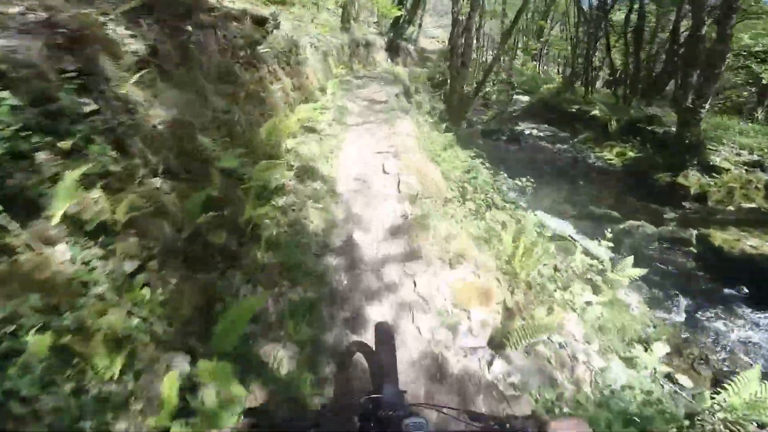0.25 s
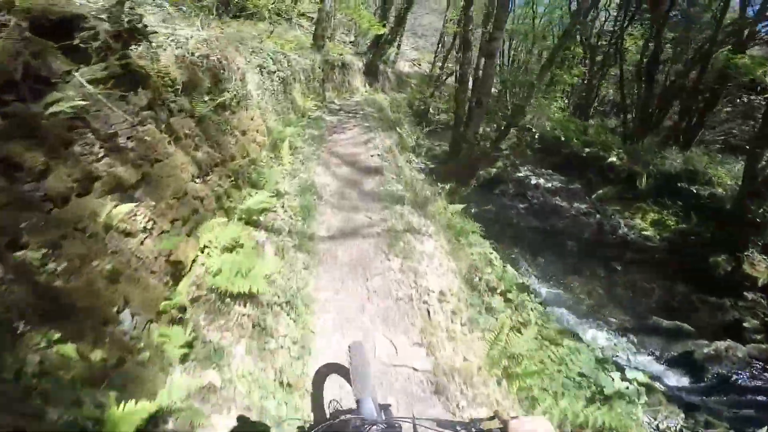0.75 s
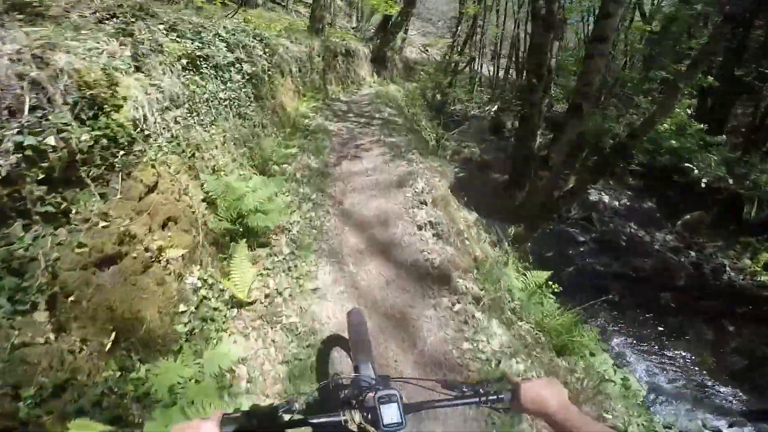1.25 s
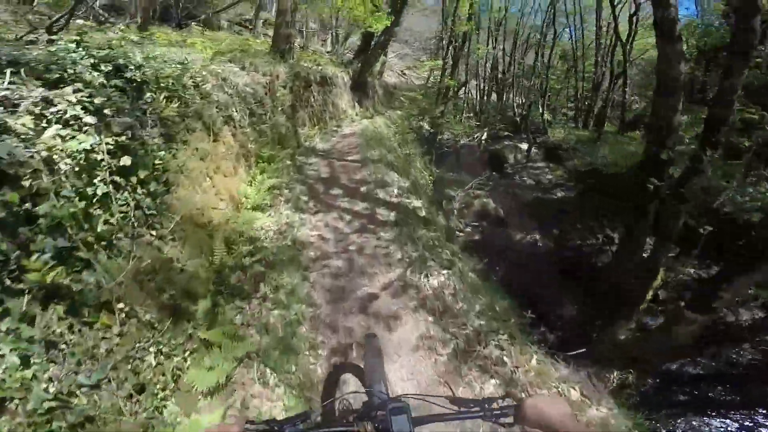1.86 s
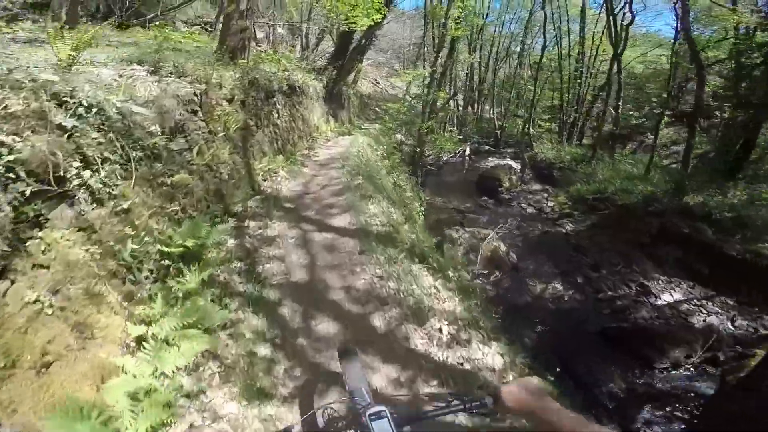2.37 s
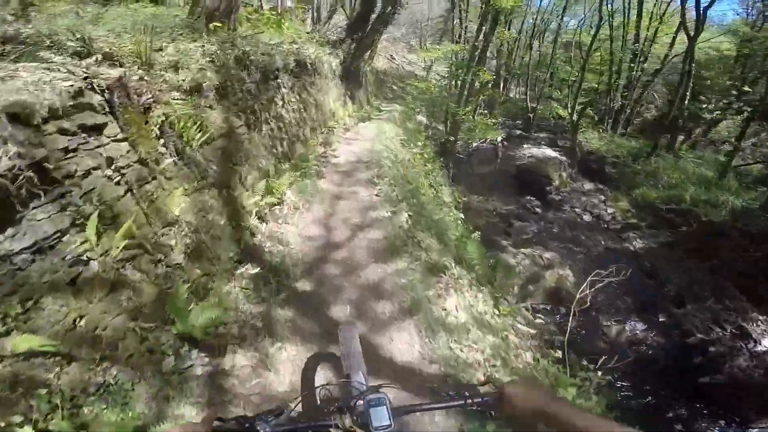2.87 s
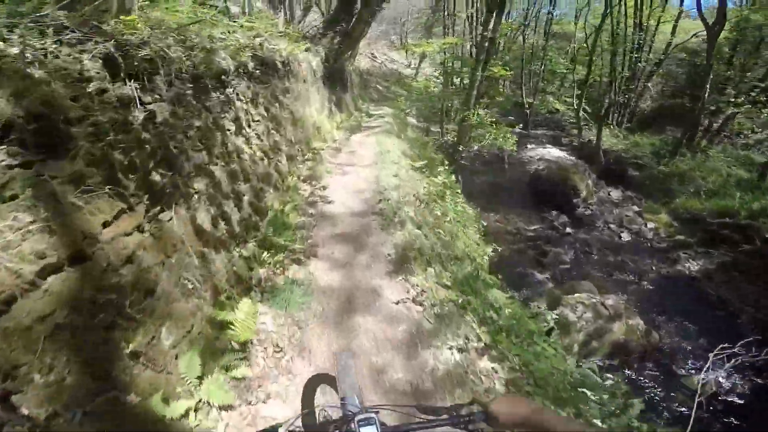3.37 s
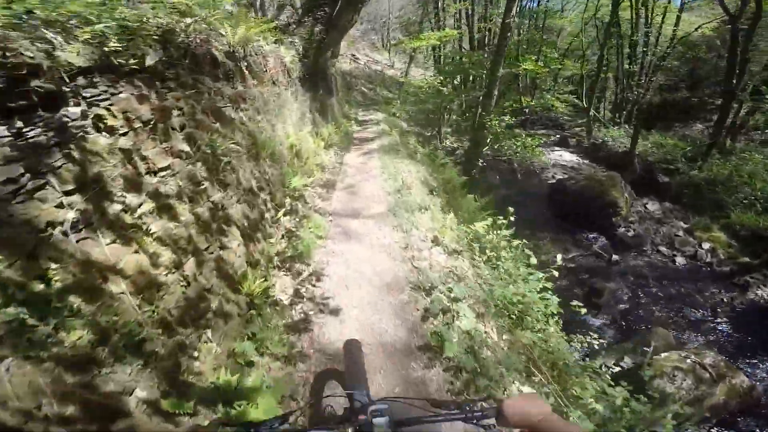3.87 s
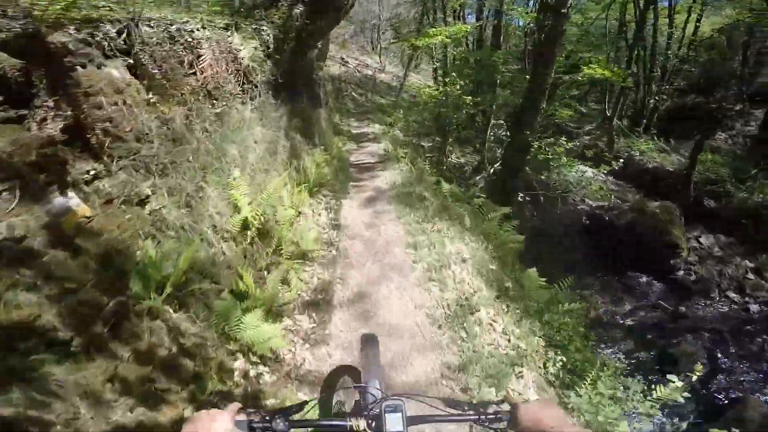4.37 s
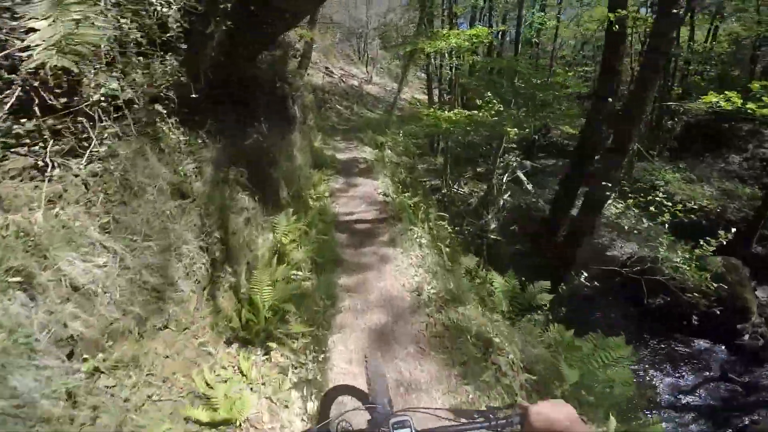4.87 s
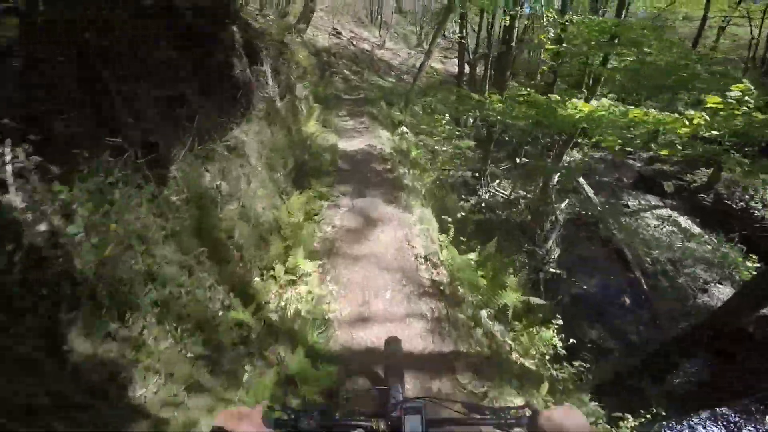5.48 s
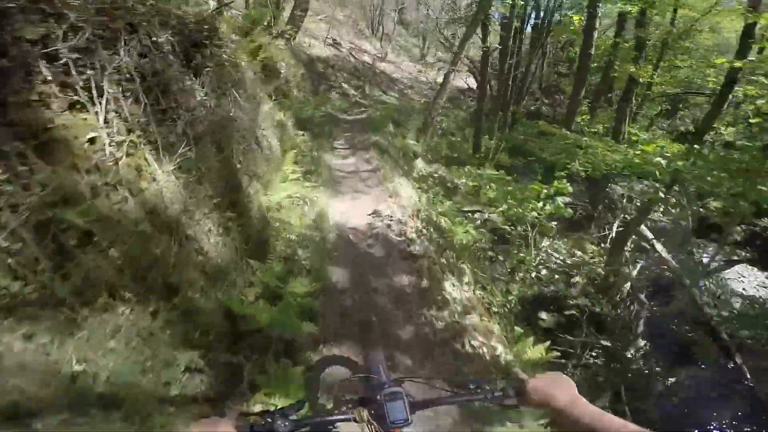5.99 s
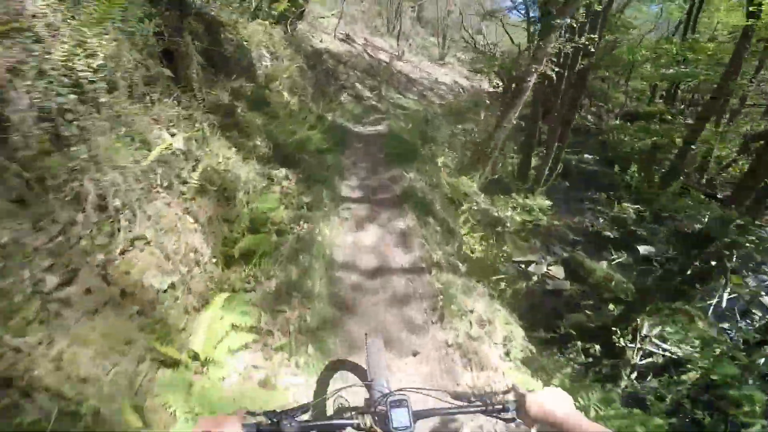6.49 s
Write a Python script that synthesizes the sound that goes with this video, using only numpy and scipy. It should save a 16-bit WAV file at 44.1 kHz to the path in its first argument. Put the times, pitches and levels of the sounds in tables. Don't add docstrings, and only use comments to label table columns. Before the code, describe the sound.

A bicycle rolls along a woodland path beside a stream, heard close through a small boxed-in camera microphone. Heavy low wind lumps and rattling parts open it, then the wind drops and a steady boxy hiss of tyres and water remains, with small ticks. Three crisp snaps come mid-way, a faint bird whistles far off, and gusts thump again at the end.

```python
import sys
import numpy as np
from scipy import signal
from scipy.fft import rfft, irfft, next_fast_len
from scipy.io import wavfile
from scipy.ndimage import uniform_filter1d, map_coordinates

SR = 44100
rng = np.random.default_rng(int(sys.argv[2]) if len(sys.argv) > 2 else 0)


def bounce(signal):
    frames = np.transpose(np.atleast_2d(signal))
    limited = np.clip(frames, -1, 1)
    pcm = np.round(limited * 32767).astype(np.int16)
    wavfile.write(sys.argv[1], SR, pcm)


def amplitude_ratio(level_db):
    exponent = np.asarray(level_db, float) / 20
    return 10 ** exponent


N = 297234
OPEN_HZ = 16700


def unit(x):
    return x / np.sqrt(np.mean(x ** 2) + 1e-20)


def along(points, hz):
    f, v = np.transpose(points)
    return np.interp(np.log(hz + 1), np.log(f + 1), v, left=-120, right=-120)


def curves(rows):
    s, *cols = np.transpose(rows)
    return [np.interp(np.arange(N) / SR, s, c) for c in cols]


def swell(s, half_s):
    t = np.arange(0, N + 64, 64) / SR
    return np.exp(-.5 * ((t - s) / half_s) ** 2)


def spread_out(v):
    return np.interp(np.arange(N), np.arange(len(v)) * 64, v)


def wobble(rate):
    knots = rng.standard_normal(int(N * 40 / SR) + 4)
    return map_coordinates(knots, [np.arange(N) * min(rate, 40) / SR])


def filtered(x, response):
    m = next_fast_len(len(x) + SR // 2)
    return irfft(rfft(x, m) * response(np.fft.rfftfreq(m, 1 / SR)), m)[:len(x)]


def housing(hz):
    # (frequency [Hz], width [Hz], lift [dB])
    case_modes = [(853, 106, 4.5), (1960, 210, 6.5), (2520, 360, 2), (3078, 72, 5), (3595, 260, 5.5),
                  (4150, 54, 3.5), (4788, 210, 10), (5580, 190, 5.5), (6920, 360, 3.5), (8060, 180, 1.5),
                  (9440, 400, 4), (10700, 350, 3), (14140, 240, 7)]
    lift = 0
    for centre, width, db in case_modes:
        damping = 1j * hz * width
        lift = lift + (amplitude_ratio(db) - 1) * damping / (centre * centre - hz * hz + damping)
    return 1 + lift


def rush(spectrum, patchy_db, grit):
    z = signal.stft(rng.standard_normal(N), nperseg=512)[2]
    field = uniform_filter1d(rng.standard_normal(z.shape), size=6, axis=0)
    field = uniform_filter1d(field, size=8, axis=1)
    x = signal.istft(z * amplitude_ratio(patchy_db * unit(field)), nperseg=512)[1][:N]
    struck = rng.random(N) < .004
    grain_db = 5 * np.minimum(rng.exponential(size=N), 2)
    grains = unit(rng.standard_normal(N) * struck * amplitude_ratio(grain_db))
    return unit(filtered(unit(x) + grit * grains, lambda hz: amplitude_ratio(along(spectrum, hz)) * housing(hz)))


def turbulence(spectrum, memory_s, steady):
    x = unit(filtered(rng.standard_normal(N), lambda hz: amplitude_ratio(along(spectrum, hz))))
    memory = int(memory_s * SR)
    power = np.abs(uniform_filter1d(uniform_filter1d(x * x, memory), memory)) + 0.022
    x = x / power ** (np.clip(steady, 0, 1) / 2)
    return unit(filtered(x, lambda hz: np.minimum(1, amplitude_ratio(along(spectrum, hz) + 17.5))))


def breeze():
    # (time [s], strength [dB])
    head_wind = [(0, -12), (.35, -25), (.6, -27), (1.1, -35.5), (1.6, -35.5), (2.3, -35), (3.1, -38),
                 (4.5, -38), (5.4, -37), (6.0, -36.5), (6.2, -28.5), (6.55, -26.5), (6.74, -33)]
    calm_db = -36
    return curves(head_wind)[0] - calm_db


def ruffle():
    # (time [s], flutter lift [dB], half length [s])
    side_air = [
        (.5, 4, 0.075),
        (0.857, 4, 0.07),
        (1.75, 1, 0.24),
        (4.0, 0, 0.079),
        (5.75, 4, 0.17),
    ]
    return spread_out(sum(db * swell(s, half_s) for s, db, half_s in side_air))


def slaps():
    # (time [s], peak level [dB], width [ms], push + or pull - [ratio])
    slap_events = [(.003, -10, 6.9, -0.82), (.039, -4, 4.5, 0.98), (0.144, -8.5, 4.5, 0.97),
                   (0.178, -6.5, 8.3, -1.3), (0.207, -5, 4.2, 1), (0.289, -8, 5.3, 1),
                   (0.348, -8.5, 5, 0.98), (.826, -10, 11, 0.88), (.967, -12, 5.3, -0.82),
                   (3.36, -5, 6, 0.26), (6.153, -11.5, 4.4, 1), (6.18, -14, 4.2, -1.17),
                   (6.241, -4.5, 5.2, 0.81), (6.44, -6, 4.6, -0.84), (6.587, -10.5, 8.3, 0.97),
                   (5.563, -18.5, 5.8, -1)]
    t = np.arange(0, N + 32, 32) / SR
    push, busy = 0, 0
    for s, db, width_ms, way in slap_events:
        push = push + way * amplitude_ratio(db) * np.exp(-.5 * ((t - s) * 1000 / width_ms) ** 2)
        busy = busy + np.exp(-.5 * ((t - s) / 0.018) ** 2)
    push, busy = (map_coordinates(v, [np.arange(N) / 32], mode="nearest") for v in (push, busy))
    leak_hz = 9
    return filtered(push, lambda hz: hz ** 2 / (hz ** 2 + leak_hz ** 2)), np.minimum(busy, 1)


def wind():
    # (frequency [Hz], density [dB per Hz])
    eddy_spectrum = [(3, -1), (8, -17.5), (13, -2), (20, -2), (28, -28), (40, -21)]
    buffet_spectrum = [(16, -17), (26, 2.5), (38, 5.5), (52, -6.5), (64, -12), (80, -31)]
    throb_spectrum = [(42, -33), (58, -1), (68, 1.5), (85, -9.5), (110, -30.5), (160, -38)]
    flutter_spectrum = [(60, -49), (100, 4.5), (150, -3.5), (250, -9.5), (400, -10.5), (600, -17.5),
                        (900, -40)]
    # (time [s], swing [dB], half length [s], tilt to small eddies [dB])
    gust_events = [(0.096, -19, 0.019, 5.5), (0.203, -6, 0.028, 7), (0.302, 8.5, 0.043, 2),
                   (0.76, 1, .04, 1.5), (.99, 5.5, 0.049, 1.5), (1.342, 1.5, 0.073, 5),
                   (1.543, -2.5, 0.046, 0.5), (1.77, 5.5, 0.032, -7.5), (1.856, -3, .04, 6.5),
                   (1.94, 6, 0.018, -5.5), (2.278, 3, 0.021, -2), (2.425, 4.5, 0.053, -1.5),
                   (2.509, -8.5, 0.039, -3), (2.753, 1.5, 0.052, -8), (2.97, 3.5, 0.023, 3.5),
                   (3.085, -8, 0.039, 6.5), (3.478, -5, 0.014, 3.5), (3.778, 4.5, 0.051, -0.5),
                   (4.233, 6, 0.014, -3.5), (4.705, 0, .025, 6.5), (4.773, 3, 0.037, -0.5),
                   (4.87, -6, 0.021, 0.5), (5.1, -2.5, 0.031, 4), (5.267, 1, 0.034, -4),
                   (5.45, -3.5, 0.052, 2), (5.787, 1, 0.035, 5.5), (6.175, 16, 0.015, 2),
                   (6.377, -7.5, .03, -3.5), (6.44, 6.5, 0.021, 12.5), (6.642, -2, 0.036, 6)]
    swing = spread_out(sum(db * swell(s, half_s) for s, db, half_s, _ in gust_events))
    tilt = spread_out(sum(tilt_db * swell(s, half_s) for s, _, half_s, tilt_db in gust_events))
    over_calm_db = breeze()

    def level(calm_db, grows, lean, share):
        return amplitude_ratio(calm_db + grows * over_calm_db + share * (swing + lean * tilt))

    heave = turbulence(eddy_spectrum, 0.024, steady=0.73)
    heave = heave * level(calm_db=-32, grows=1.1371, lean=-1.03, share=0.95)
    buffet = turbulence(buffet_spectrum, 0.093, steady=0.76)
    buffet = buffet * level(calm_db=-40, grows=0.93, lean=0.08, share=1.42)
    throb = turbulence(throb_spectrum, 0.041, steady=0.66)
    throb = throb * level(calm_db=-49.5, grows=0.65, lean=1.24, share=1.24)
    lumps = amplitude_ratio(0.59 * wobble(17.0) + 1.86 * wobble(25))
    flutter = unit(lumps * rush(flutter_spectrum, patchy_db=-0.5, grit=0.23)) * amplitude_ratio(ruffle())
    flutter = flutter * level(calm_db=-61.5, grows=0.4828, lean=-0.2, share=0.13)
    slap, busy = slaps()
    return slap + amplitude_ratio(-12 * busy) * (heave + buffet + throb) + flutter


def tyres(near_db, shake):
    # (frequency [Hz], density [dB per Hz])
    drone_spectrum = [(300, -18.5), (500, -3.5), (750, -1), (1000, -5.5), (1200, -25), (1500, -12)]
    drone_db = -66 + near_db + 0.15 * breeze() + 0.17 * ruffle()
    return amplitude_ratio(drone_db + 0.68 * shake) * rush(drone_spectrum, patchy_db=1.5, grit=0.26)


def stream(near_db, shake):
    # (frequency [Hz], density [dB per Hz])
    water_spectrum = [(900, -17.5), (1150, -4), (1350, 1), (1700, -3), (2300, -5), (3300, -5.5),
                      (4200, -6.5), (4500, -14.5), (5200, -20), (6500, -70)]
    spray_spectrum = [(4000, -23), (5200, -3.5), (6300, -4.5), (8300, -5.5), (9000, -9), (12000, -11),
                      (15600, -14.5)]
    water = amplitude_ratio(-57.5 + near_db + 0.53 * shake) * rush(water_spectrum, patchy_db=0.83, grit=0.23)
    spray = amplitude_ratio(-67.5 + near_db + 0.43 * shake) * rush(spray_spectrum, patchy_db=1.44, grit=0.2)
    return water + spray


def brake_pad():
    # (time [s], level [dB], decay by 60 dB [s])
    pad_touches = [
        (-.1, -72, 3.9),
        (5.6, -79, 9.5),
    ]
    drag_db, rise_s = -90, 0.033
    whisper = unit(filtered(rng.standard_normal(N), lambda hz: np.exp(-((hz - 10750) / 300) ** 2)))
    t = np.arange(N) / SR
    level = amplitude_ratio(drag_db)
    for s, db, t60 in pad_touches:
        level = level + amplitude_ratio(db - 60 * (t - s) / t60) * np.clip((t - s) / rise_s, 0, 1)
    return level * whisper


def path():
    # (time [s], level [dB])
    bank_nearness = [(0, 4), (.75, 3.5), (1.3, 3.5), (2.1, 0.94), (3, -0.14), (5, -0.7), (5.46, 0.6),
                     (6, 0.25), (6.74, -0.3)]
    near_db, = curves(bank_nearness)
    shake = wobble(14)
    return tyres(near_db, shake) + stream(near_db, shake) + brake_pad()


def loose_parts():
    # (frequency [Hz], density [dB per Hz])
    loose_spectrum = [(300, -17), (500, 5), (1000, 2.5), (1500, 7.5), (2200, -4.5), (3500, 0), (5000, -38)]
    # (time [s], level [dB], half length [s])
    jolt_events = [
        (0, -57, 0.11),
        (0.207, -53, .06),
        (.34, -55.5, 0.1),
        (0.97, -52.5, 0.044),
        (6.3, -61.5, 0.045),
        (6.447, -57, 0.038),
    ]
    chatter = unit(amplitude_ratio(3.3 * wobble(35)) * rush(loose_spectrum, patchy_db=3.5, grit=0.34))
    jolt = spread_out(sum(amplitude_ratio(db) * swell(s, half_s) for s, db, half_s in jolt_events))
    jingle = amplitude_ratio(-82.5 + 0.37 * breeze())
    return (jolt + jingle) * chatter


def ticks():
    # (time [s], peak level [dB], ringing frequency [Hz], decay by 60 dB [s])
    frame_contacts = [(0.118, -43, 5600, 0.017), (.14, -39.5, 1610, 0.094), (0.1793, -30, 1230, 0.022),
                      (.184, -44.5, 2940, .067), (0.2073, -33, 1830, 0.012), (.245, -53, 1850, .061),
                      (0.3115, -41.5, 1395, 0.078), (.357, -42, 1860, 0.025), (0.584, -46, 4150, .03),
                      (1.046, -45, 5200, .017), (1.197, -35, 1487, 0.12), (1.2045, -30.5, 1510, 0.013),
                      (1.209, -35, 2050, 0.027), (1.748, -47, 6800, .015), (1.89, -47, 6830, 0.019),
                      (3.3947, -44.5, 1950, .03), (4.8943, -43, 1950, 0.037), (5.8386, -51, 1960, .03),
                      (6.311, -45, 1930, 0.071)]
    # (time [s], peak level [dB], frequency [Hz], decay by 60 dB [s])
    root_thumps = [
        (.864, -39.5, 200, .028),
        (1.362, -38, 180, .034),
    ]
    tick_octaves, thump_octaves = .44, .7
    contacts = [(*r, tick_octaves) for r in frame_contacts] + [(*r, thump_octaves) for r in root_thumps]
    out, t = np.zeros(N + SR), np.arange(SR // 10) / SR
    for s, db, ring_hz, t60, spread in contacts:
        def band(f):
            octaves = np.log2((f + 1) / (.94 * ring_hz))
            return np.exp(-.5 * (octaves / spread) ** 2) * housing(f) ** 1.1
        rattle = unit(filtered(rng.standard_normal(len(t)), band))
        hit = rattle + 1.15 * np.sin(2 * np.pi * ring_hz * t)
        hit = hit * amplitude_ratio(-60 * t / t60) * (1 - np.exp(-t / 0.000043))
        out[round(s * SR):][:len(t)] += amplitude_ratio(db) * hit / np.abs(hit).max()
    return out[:N]


def tread_hum():
    # (time [s], length [s], tread frequency [Hz], rise at middle [Hz], level [dB])
    firm_stretches = [
        (2.7, 1.0, 250, 35, -79),
        (4.95, .55, 250, 42, -75),
    ]
    drift_hz, waver = 3 * wobble(12), amplitude_ratio(5.5 + 2 * wobble(8))
    hum = np.zeros(N)
    for s, length, hz, rise_hz, db in firm_stretches:
        arc = np.sin(np.pi * np.clip((np.arange(N) / SR - s) / length, 0, 1))
        phase = 2 * np.pi * np.cumsum(hz + rise_hz * arc ** 2 + drift_hz) / SR
        hum += amplitude_ratio(db) * np.sqrt(np.abs(arc)) * np.sin(phase)
    return waver * hum


def snaps():
    # (time [s], peak level [dB], crack share [ratio], bounce delay [s], bounce level [dB])
    snap_events = [
        (3.2053, -28.5, 0.48, .006, -9.5),
        (3.3398, -29, 0.36, .0058, -6.5),
        (4.2877, -28, 0.36, 0.0013, -17),
    ]
    # (frequency [Hz], level [dB])
    snap_modes = [
        [(1580, -10), (2450, -2.5), (3180, 0), (3900, -2), (4730, -2), (5400, -11), (6850, -4), (8100, 2.5),
         (9300, -12), (12500, -7), (15000, -11)],
        [(2010, -7), (2420, -8), (3130, -6), (3550, 0.5), (4170, -10), (4730, -2), (5900, -16), (6800, -7.5),
         (8230, -6.5), (10690, -14), (14400, -24)],
        [(875, -3), (1100, -9.5), (1340, -9), (1885, 4), (2440, -8), (3035, -7), (3900, -9), (4880, -10),
         (5900, -10), (6700, -11), (8150, -11), (9600, -10), (13000, -18)],
    ]
    t60 = .015
    out, t = np.zeros(N + SR), np.arange(SR // 20) / SR
    for (s, db, crack, delay, bounce_db), modes in zip(snap_events, snap_modes):
        (lowest_hz, _), (_, last_db) = modes[0], modes[-1]
        crack_spectrum = [(lowest_hz / 2, -35)] + modes + [(OPEN_HZ, last_db - 16)]
        for start, size_db in ((s, db), (s + delay, db + bounce_db)):
            ring = 0
            for hz, level in modes:
                decay = amplitude_ratio(level - 60 * t / t60 * (hz / 2000) ** 0.16)
                ring = ring + decay * np.sin(2 * np.pi * (hz * t + rng.random()))
            noise = unit(filtered(rng.standard_normal(len(t)), lambda f: amplitude_ratio(along(crack_spectrum, f))))
            noise = noise * amplitude_ratio(-60 * t / t60 * 2.2)
            hit = (ring + 3 * crack * noise) * (1 - np.exp(-t / 0.00038))
            out[round(start * SR):][:len(t)] += amplitude_ratio(size_db) * hit / np.abs(hit).max()
    return out[:N]


def bird():
    # (time [s], length [s], start frequency [Hz], end frequency [Hz], level [dB])
    chirp_events = [
        (4.67, .06, 6650, 6550, -70),
        (4.84, .06, 6400, 5450, -64),
        (4.945, .03, 4600, 4450, -66),
    ]
    out = np.zeros(N)
    for s, length, start_hz, end_hz, db in chirp_events:
        u = np.arange(int(length * SR)) / (length * SR)
        phase = 2 * np.pi * np.cumsum(start_hz + (end_hz - start_hz) * u ** 1.65) / SR
        quaver = 1.5 * wobble(40)[:len(u) * 8:8]
        out[round(s * SR):][:len(u)] += amplitude_ratio(db) * np.sin(np.pi * u) * np.sin(phase + quaver)
    return out


def scene():
    return (wind() + path() + loose_parts() + ticks() + tread_hum() + snaps() + bird())[None]


def low_pass(x):
    return signal.sosfilt(signal.butter(12, 16700, fs=SR, output="sos"), x)


def record(dry):
    hz, t, z = signal.stft(dry[0], SR, nperseg=1024, boundary="even")
    f = hz[:, None]
    strain_db = np.maximum(3.5 + 0.25 * np.interp(t * SR, np.arange(N), breeze()), 0)
    blocks = rng.standard_normal((40, len(t)))[(hz / 700).astype(int)]
    flicker = amplitude_ratio(strain_db * (np.minimum(blocks, 1) - 0.1) * np.clip((f - 10300) / 2000, 0, 1))
    hole_share, hole_db = .07, -14
    holes = (rng.random((40, len(t))) < hole_share)[(hz / 640).astype(int)] & (np.abs(f - 13450) < 640)
    top = np.sum(np.abs(z[hz > 12000]) ** 2, axis=0)
    snap = top > np.median(top) * amplitude_ratio(2 * 9)
    wander = unit(uniform_filter1d(rng.standard_normal(len(t)), size=4))
    edge_hz = 15150 - 25 * strain_db + 130 * wander
    gain = np.where(snap, f < OPEN_HZ, flicker * amplitude_ratio(hole_db * holes) * (f < edge_hz))
    x = signal.istft(z * gain, SR, nperseg=1024)[1][None, :N]
    return low_pass(x)


dry = scene()
out = record(dry)
bounce(out)
```